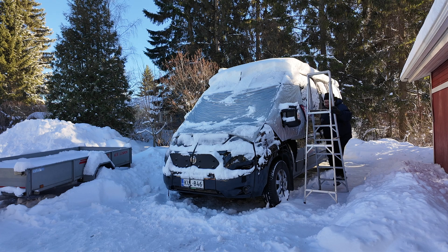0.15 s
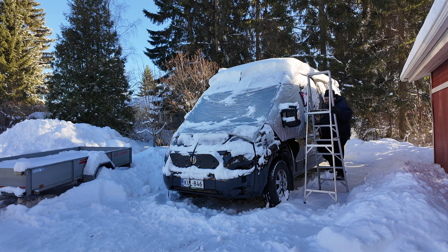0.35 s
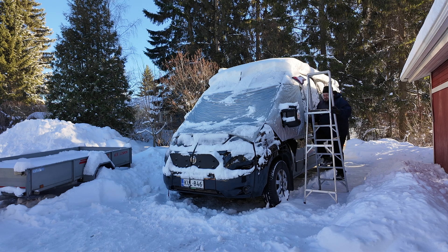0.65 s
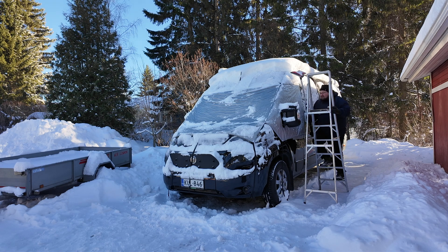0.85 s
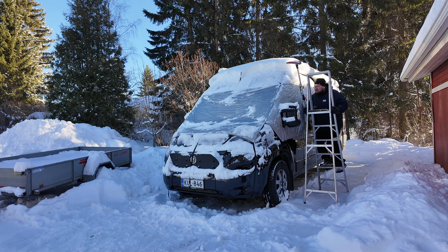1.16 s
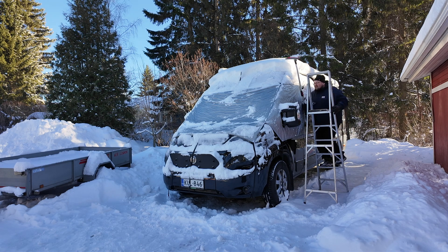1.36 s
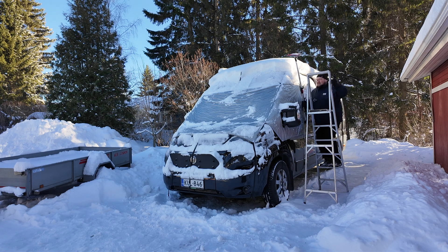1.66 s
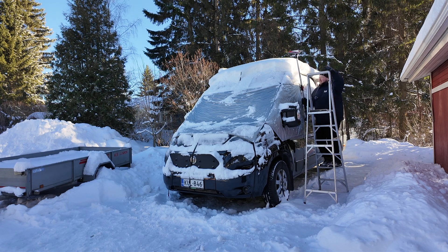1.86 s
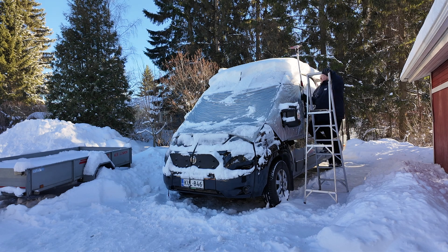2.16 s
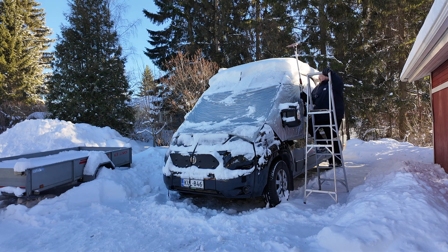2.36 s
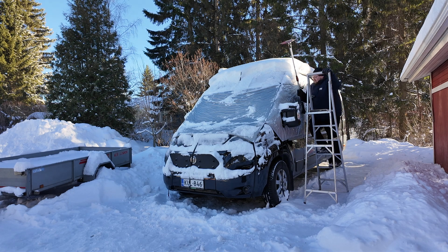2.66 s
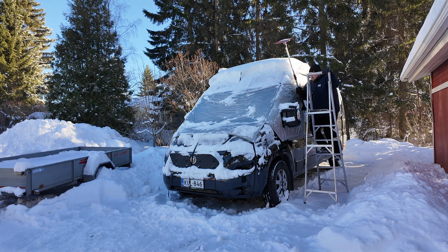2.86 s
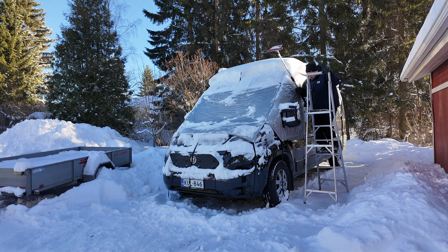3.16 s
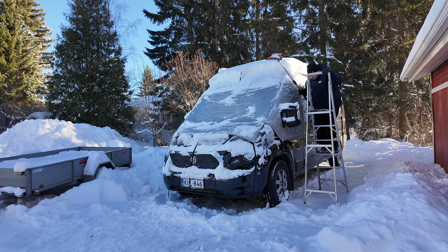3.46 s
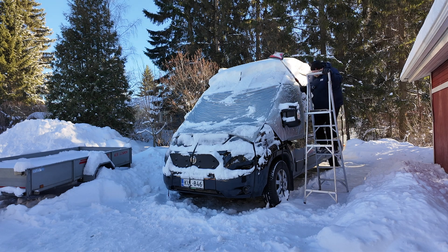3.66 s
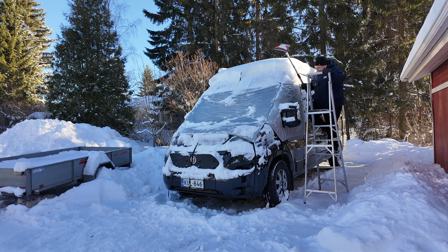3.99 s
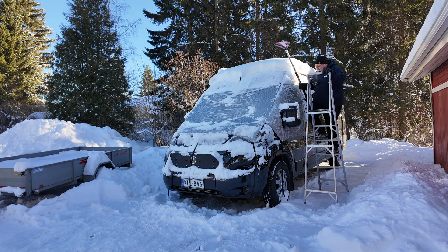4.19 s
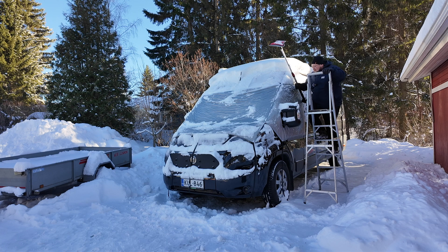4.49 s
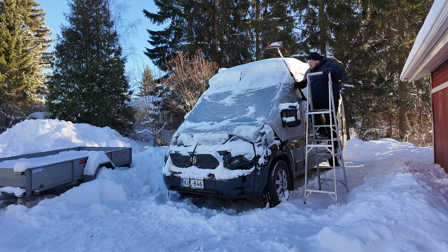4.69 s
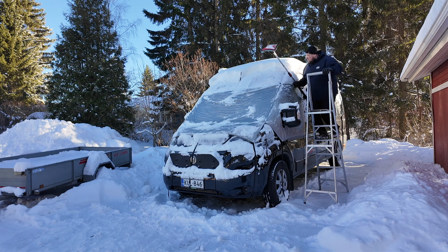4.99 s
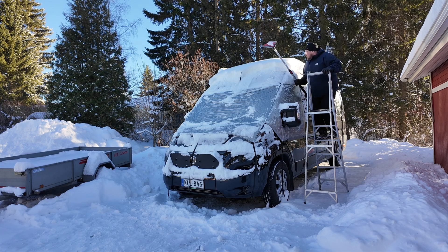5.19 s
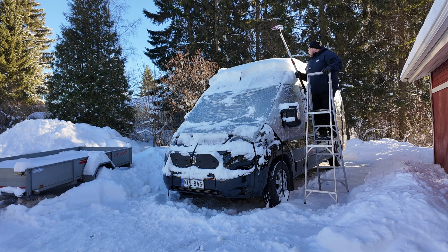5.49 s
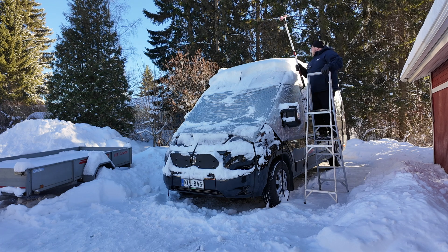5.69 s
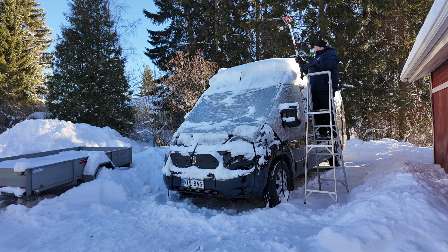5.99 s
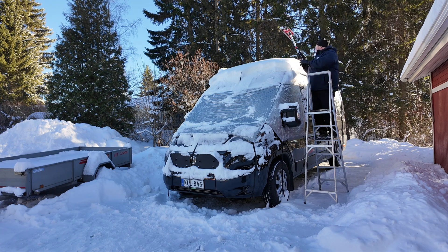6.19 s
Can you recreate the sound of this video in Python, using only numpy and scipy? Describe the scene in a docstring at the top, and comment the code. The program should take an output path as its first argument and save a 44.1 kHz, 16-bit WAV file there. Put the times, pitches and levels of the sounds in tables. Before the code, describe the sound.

Someone climbs a light metal ladder beside a snowed-in van outdoors. Crunching snow and a loud double clack of the tool come first, then clustered sole knocks and crunchy steps. The pole extends with a rasping tubular hiss and clicks. Further crunching steps rise to the strongest one, cloth swishes, then a tiny squeak and a short soft snow sweep. Still air, short dull reflections.

```python
"""Snow crunches under boots and soles land on an aluminium ladder beside a snowed-in van in a quiet yard.
A snow tool knocks, its pole slides out, a jacket rustles, the ladder squeaks, and at last the soft
head sweeps snow off the roof. Contacts are fractured noise driving struck modes; cloth, friction and
loose snow are coloured grains; the pole's air column and the squeak are gliding or wavering tones.
A scattered tail and a steady bed of air surround the work."""
import sys
import numpy as np
from scipy import signal
from scipy.fft import rfft, irfft
from scipy.io import wavfile
from scipy.ndimage import uniform_filter1d

SR = 44100
rng = np.random.default_rng(int(sys.argv[2]) if len(sys.argv) > 2 else 0)


def wav_out(sig):
    """Save sig, one row per channel (or a flat mono array), as 16-bit PCM at SR to the path in sys.argv[1]."""
    wavfile.write(sys.argv[1], SR, np.round(np.clip(np.atleast_2d(sig).T, -1, 1) * 32767).astype(np.int16))


N = 279594
TIME = np.arange(N) / SR
RING_TIME = TIME[:32768]   # time axis of every impulse response


def from_db(db):
    """Logarithmic level: decibels become an amplitude gain."""
    return 10 ** (np.asarray(db) / 20)


def unit_energy(x):
    """Parseval's relation: a response of unit energy passes white noise at equal power."""
    return x / np.sqrt(np.sum(x ** 2) + 1e-20)


def in_time(rows):
    """Linear interpolation: the columns of a curve at every sample."""
    start_s, *columns = np.transpose(rows)
    return [np.interp(TIME, start_s, column) for column in columns]


def swells(rows):
    """Gaussian envelope: the summed power of smooth strokes, each a bell around its middle."""
    return sum(from_db(level_db) ** 2 * np.exp(-2 * np.pi * ((TIME - middle_s) / length_s) ** 2)
               for middle_s, length_s, level_db in rows)


def band(x, low_hz, high_hz, order=3):
    """Causal band-pass: a Butterworth filter keeps one register."""
    edges_hz = [low_hz, min(high_hz, .45 * SR)]
    return signal.sosfilt(signal.butter(order, edges_hz, "band", fs=SR, output="sos"), x + 1e-18)


def through(x, response):
    """Linear superposition: every sample of a signal sets off the impulse response."""
    return signal.fftconvolve(x, response)[:N]


def resonance(x, hz, quality):
    """Simple resonator: one broad peak with gain 1 on top."""
    return signal.lfilter(*signal.iirpeak(hz, max(quality, 1), fs=SR), x + 1e-18)


def hollow(x, hz, reflection, count):
    """Comb filtering: repeated reflections in a gap reinforce multiples of hz, which may vary in time."""
    weights = unit_energy(np.clip(reflection, 0, .9) ** np.arange(count))
    return sum(weight * np.interp(TIME - k / hz, TIME, x) for k, weight in enumerate(weights))


def colour(points):
    """Minimum phase by folding the cepstrum: the given spectrum, falling 12 dB more per octave past its ends."""
    hz, db = np.transpose(points)
    size = len(RING_TIME)
    log_hz = np.log(np.maximum(np.fft.rfftfreq(size, 1 / SR), 1))
    outside = np.abs(log_hz - np.clip(log_hz, np.log(hz[0]), np.log(hz[-1])))
    gain = from_db(np.interp(log_hz, np.log(hz), db))
    cepstrum = irfft(np.log(gain) - 2 * outside)
    cepstrum[size // 2:] = 0
    return unit_energy(irfft(np.exp(rfft(2 * cepstrum))))


def ringing(modes):
    """Modal superposition: struck modes, each a dying sine with its share of the energy."""
    response = np.zeros(len(RING_TIME))
    for hz, energy_db, t60 in modes:
        mode = np.sin(2 * np.pi * hz * RING_TIME) * from_db(-60 * RING_TIME / t60)
        response += from_db(energy_db) * rng.choice([-1, 1]) * unit_energy(mode)
    return response


def grains(per_s, spread_db, smooth_db, size=400):
    """Shot noise: tiny fractures of uneven size over smooth friction, at an even running power of 1."""
    sizes = from_db(spread_db * np.minimum(rng.exponential(1, N), 4)) * rng.choice([-1, 1], N)
    clicks = sizes * (rng.random(N) < per_s / SR)
    x = clicks / clicks.std() + from_db(smooth_db) * rng.standard_normal(N)
    return x / np.sqrt(uniform_filter1d(x ** 2, size) + 1e-9)


# spectrum of the still air: pitch_hz [Hz], relative_db [dB per Hz]
AIR_SPECTRUM = [(20, -34), (45, -14), (80, -6), (140, 0.5), (300, -9), (700, -12.5), (2000, -25.5),
                (7000, -21.5), (16000, -38)]


def winter_air(level_db=-63):
    """Stationary noise: the air is a steady bed of coloured random pressure."""
    return from_db(level_db) * through(rng.standard_normal(N), colour(AIR_SPECTRUM))


# scattered tail of the yard: low_hz [Hz], high_hz [Hz], relative_db [dB], t60_s [s]
YARD_TAIL = [(80, 190, -9, 0.41), (350, 1260, -13, 0.28), (1400, 2400, -19.5, 0.17),
             (5000, 12000, -61, .25)]


def yard(x, build_s=0.045):
    """Diffuse scattering: shed wall and trees return a short, dull tail; the snow swallows the rest."""
    tail = 0
    for low_hz, high_hz, db, t60 in YARD_TAIL:
        envelope = np.minimum(RING_TIME / build_s, 1) * from_db(-60 * RING_TIME / t60)
        scatter = rng.standard_normal(len(RING_TIME)) * envelope
        tail = tail + from_db(db) * band(unit_energy(scatter), low_hz, high_hz, order=2)
    return through(x, tail)


# swishes of the jacket with each reach: middle_s [s], length_s [s], level_db [dB]
JACKET_SWISHES = [(0.02, 0.49, -49.5), (0.58, 0.52, -49), (1.05, 0.24, -48), (1.5, 0.4, -55),
                  (2.03, 0.39, -52), (2.3, 0.11, -55.5), (2.64, 0.15, -51), (2.84, 0.17, -59),
                  (3.22, 0.36, -56), (4.12, 0.17, -59), (4.6, 0.2, -52.5), (4.76, 0.1, -51),
                  (5.02, 0.31, -54), (5.88, 0.9, -61), (6.14, 0.18, -54.5)]
# spectrum of dull rubbing: pitch_hz [Hz], relative_db [dB per Hz]
RUBBING_SPECTRUM = [(60, -7.5), (130, -0.5), (300, 0.5), (480, 4), (640, 5), (1000, 1.5), (1350, -1.5),
                    (2000, -32.5)]
# spectrum of the jacket's hiss: pitch_hz [Hz], relative_db [dB per Hz]
JACKET_SPECTRUM = [(900, -13.5), (1450, 1), (2100, 1.5), (3300, 5), (4300, -1.5), (6700, -1.5),
                   (9000, -11.5), (12000, -22.5), (16000, -36)]
REST_DB = -61   # rustle between reaches
RUB_DB = -0.5   # dull rubbing re jacket hiss
# a sole keeps rubbing after it lands, barely stronger after a longer landing (dB per second of its t60)
SETTLE_DB, SETTLE_T60_S, SETTLE_DB_PER_S = -53.5, 1.0, 0.2


def movement(sheen_hz=1560, wander=0.24):
    """Sliding friction: sleeves hiss with a wandering hollow sheen; clothes and soles rub dully on the ladder."""
    reach = from_db(REST_DB) ** 2 + swells(JACKET_SWISHES)
    usual_s = np.mean([length_s for s, rise, length_s, *rest in SOLE_CONTACTS])
    settle = np.zeros(N)
    for s, rise, length_s, *rest in SOLE_CONTACTS:
        settle_db = SETTLE_DB + SETTLE_DB_PER_S * (length_s - usual_s)
        settle += (TIME >= s) * from_db(settle_db - 60 * np.abs(TIME - s) / SETTLE_T60_S) ** 2
    rubbing = through(grains(per_s=250, spread_db=3.5, smooth_db=2.5, size=4000), colour(RUBBING_SPECTRUM))
    posture = uniform_filter1d(uniform_filter1d(rng.standard_normal(N), size=20000), size=20000)
    gap_hz = sheen_hz * np.exp(wander * posture / posture.std())
    fibres = grains(per_s=2500, spread_db=5.5, smooth_db=1.5, size=3000)
    cloth = through(hollow(fibres, gap_hz, reflection=0.3, count=3), colour(JACKET_SPECTRUM))
    return np.sqrt(from_db(RUB_DB) ** 2 * reach + settle) * rubbing + np.sqrt(reach) * cloth


# thin high ticks: start_s [s], level_db [dB]
HIGH_TICKS = [(5.881, -42.5), (5.889, -50), (5.901, -44)]


def high_ticks(t60=0.023, low_hz=7700, high_hz=9100):
    """Exponential decay: a quick run of faint, thin ticks, each a dying burst of band-limited noise."""
    level = sum(from_db(db - 60 * np.abs(TIME - s) / t60) * (TIME >= s) for s, db in HIGH_TICKS)
    response = unit_energy(band(RING_TIME == 0, low_hz, high_hz, order=2))
    return through(level * rng.standard_normal(N), response)


# squeaks of the ladder: start_s [s], length_s [s], level_db [dB]
LADDER_SQUEAKS = [(5.508, 0.01, -34), (5.518, 0.013, -28), (5.524, 0.036, -46.5)]
# partials of the squeak: multiple [of the fundamental], relative_db [dB]
PARTIALS = [(1, -9), (3, -19), (4, -16), (5, -2)]


def squeaks(pitch_hz=920, waver=0.0165):
    """Stick-slip: a dry ladder joint slips at an unsteady rate; the fifth partial is strongest."""
    unsteady = uniform_filter1d(rng.standard_normal(N), size=50)
    phase = 2 * np.pi * np.cumsum(pitch_hz * (1 + waver * unsteady / unsteady.std())) / SR
    level = np.zeros(N)
    for s, length, db in LADDER_SQUEAKS:
        level += from_db(db) * np.sin(np.pi * np.clip((TIME - s) / length, 0, 1))
    tone = sum(from_db(db) * np.sin(round(k) * phase) for k, db in PARTIALS)
    return np.sqrt(2) * level * tone


# low, dull thumps: start_s [s], level_db [dB], pitch_hz [Hz] at the start
LOW_THUMPS = [(0.523, -19.5, 194), (0.578, -38, 105), (0.665, -27, 181), (1.31, -33, 118),
              (3.284, -36, 212), (4.348, -29, 111), (5.919, -48, 110)]


def thumps(rise_s=0.001, t60_s=0.036, sag_s=0.051):
    """Damped oscillation: a dull thump is a few low cycles whose pitch would halve in the sag time."""
    out = np.zeros(N)
    for s, db, hz in LOW_THUMPS:
        t = np.maximum(TIME - s, 0)
        phase = 2 * np.pi * hz * sag_s * np.log1p(t / sag_s)
        decay = from_db(db - 60 * np.maximum(t - rise_s, 0) / t60_s)
        out += decay * np.minimum(t / rise_s, 1) * np.sin(phase)
    return band(out, 55, 900, order=2)


# the pole slides out: start_s [s], level_db [dB], pitch_hz [Hz] of the tube resonance
POLE_SLIDE = [(2.28, -77, 1860), (2.35, -41.5, 1640), (2.40, -39.5, 1452), (2.45, -33.5, 1440),
              (2.50, -43, 1497), (2.58, -39, 1450), (2.64, -56, 1370), (2.70, -75, 1400)]
# spectrum of its friction: pitch_hz [Hz], relative_db [dB per Hz]
SLIDE_SPECTRUM = [(700, -22), (1500, -29), (2100, -5), (3000, -1.5), (4400, -8), (6500, -5.5),
                  (9500, -20.5), (16000, -50)]


def pole_slide(width_hz=90, hollow_hz=1450):
    """Air-column resonance: tube hisses in tube, and the column sings, sinking overall as it grows longer."""
    level_db, tube_hz = in_time(POLE_SLIDE)
    rub = grains(per_s=12000, spread_db=5.5, smooth_db=16)
    friction = through(hollow(rub, hollow_hz, reflection=0.22, count=7), colour(SLIDE_SPECTRUM))
    phase = 2 * np.pi * np.cumsum(tube_hz) / SR
    blur = unit_energy(np.exp(-np.pi * width_hz * RING_TIME))   # friction noise keeps the column ringing
    excitation = through([1, 1j] @ rng.standard_normal((2, N)), blur)
    sing = (excitation * np.exp(1j * phase)).real
    return from_db(level_db) * (from_db(-4.5) * friction + from_db(-10.0) * sing)


# light passes of the soft head over the roof snow: middle_s [s], length_s [s], level_db [dB]
ROOF_SKIMS = [(3.27, 0.18, -58), (3.65, 0.35, -56.5), (5.12, 0.37, -62)]
# spectrum of a skim: pitch_hz [Hz], relative_db [dB per Hz]
SKIM_SPECTRUM = [(1500, -9), (3800, -6), (5200, -1.5), (7000, -5.5), (10500, -16), (15000, -33)]


def roof_skims(sheen_hz=1700):
    """Granular friction: light passes of the head raise only a thin, high hiss."""
    friction = grains(per_s=4400, spread_db=9, smooth_db=19.0, size=2000)
    crystals = hollow(friction, sheen_hz, reflection=0.23, count=3)
    return np.sqrt(swells(ROOF_SKIMS)) * through(crystals, colour(SKIM_SPECTRUM))


# the head sweeps the roof: start_s [s], level_db [dB]
ROOF_SWEEP = [(6.03, -84), (6.10, -54), (6.14, -46.5), (6.185, -39), (6.215, -42.5), (6.245, -34),
              (6.27, -43.5), (6.30, -45), (6.34, -54.5)]
# spectrum of the sweep: pitch_hz [Hz], relative_db [dB per Hz]
SWEEP_SPECTRUM = [(24, -32), (40, -8), (104, -0.5), (243, -9), (283, -4.5), (422, -10.5), (1270, -5.5),
                  (1760, -13.5), (2570, -10), (3060, -12), (7540, -18.5), (16000, -54)]


def roof_sweep():
    """Granular flow: the soft head pushes loose crystals across the roof."""
    level_db, = in_time(ROOF_SWEEP)
    crystals = grains(per_s=2500, spread_db=2.0, smooth_db=0, size=900)
    return from_db(level_db) * through(crystals, colour(SWEEP_SPECTRUM))


# registers of a contact, thud, body, crunch, fizz: low_hz [Hz], high_hz [Hz, held below 0.45 SR]
CONTACT_REGISTERS = [(62, 389), (290, 1176), (1400, 4850), (5000, 27000)]
# spectrum of a contact: pitch_hz [Hz], relative_db [dB per Hz]
CONTACT_SPECTRUM = [(40, -15), (100, -20), (200, -6), (300, -3), (480, 0.5), (850, -4.5), (1120, -2.5),
                    (1600, -5), (3500, -6), (4500, -9.5), (7000, -11.5), (10000, -26.5), (16000, -48)]


def contacts(table, modes, fractures, ring_db, blow_db, focus_db, trim_db, quality=4.9):
    """Source and filter: each contact lands, loads up and lets go, driving resonances set by where it touches."""
    drive = np.zeros((len(CONTACT_REGISTERS), N))
    for s, rise, t60, *levels_db, body_hz, crunch_hz in table:
        start, rise = max(round(s * SR), 0), max(rise, 1 / SR)
        t = RING_TIME[:min(N - start, SR // 3)]
        load = np.minimum(t / rise, 1) * from_db(-60 * np.maximum(t - rise, 0) / t60)
        grinding = load * fractures[rng.integers(N // 2):][:len(t)]
        # the more sudden the touch, the stronger its first blow
        blow = np.outer(from_db(blow_db), t == 0) * np.exp(-rise / 0.011)
        thud, body, crunching, fizz = grinding + blow
        focused = []
        for force, hz, db in zip((body, crunching), (body_hz, crunch_hz), focus_db):
            peak = from_db(db) * resonance(force, hz, quality)
            focused.append((force + peak) / np.sqrt(1 + from_db(db)))
        drive[:, start:start + len(t)] += from_db(levels_db)[:, None] * [thud, *focused, fizz]
    response = colour(CONTACT_SPECTRUM) + from_db(ring_db) * ringing(modes)
    return sum(from_db(db) * through(x, unit_energy(band(response, low_hz, high_hz)))
               for x, (low_hz, high_hz), db in zip(drive, CONTACT_REGISTERS, trim_db))


def knock(s, rise, t60, db, body_db, hz):
    """Impact spectrum: a bright clack over as much hollow body as the touch wakes; hollow knocks are duller."""
    thud_db = db + body_db - 8
    fizz_db = db - 11 - 0.39 * body_db   # dB of fizz lost for each dB of hollow body
    return (s, rise, t60, thud_db, db + body_db, db, fizz_db, 858, hz)   # 858 Hz: the hollow body


# the snow tool knocks and its lock clicks: start_s [s], t60_s [s], level_db [dB],
# body_db [dB re level, hollow body], pitch_hz [Hz, the clack]
TOOL_KNOCKS = [(0.178, 0.12, -34, -4.5, 3600), (0.523, 0.072, -17, -3, 3500),
               (0.533, 0.023, -15.5, -5.5, 3500), (0.546, .2, -32, 1, 3450), (0.58, 0.22, -35, 1.5, 2300),
               (0.647, 0.031, -36, -13, 3110), (0.665, 0.089, -36.5, 1, 2800),
               (0.699, 0.017, -41, 8.5, 3000), (1.328, 0.06, -42, -25, 3720),
               (2.103, 0.038, -32.5, -1.5, 2340), (2.242, 0.031, -41, -16, 2770),
               (2.567, 0.21, -30.5, -9, 2750), (2.604, 0.023, -20, -31.5, 2780),
               (2.617, 0.014, -23, -11, 2850), (2.68, 0.033, -35.5, -4, 2830),
               (2.693, 0.016, -31.5, -22, 2880), (2.746, 0.057, -43.5, -20, 3270),
               (2.787, 0.016, -36, -11, 2950), (2.898, 0.048, -41, -25, 2570),
               (3.325, 0.0076, -49, 15, 2200), (4.13, 0.048, -45, -3.5, 2940),
               (4.976, 0.051, -39.5, 2, 2900)]
# the pole binds and rasps as it slides: start_s [s], rise_s [s], t60_s [s], level_db [dB],
# body_db [dB re level, hollow body]
POLE_RASPS = [(2.462, .02, 0.16, -25, -3), (2.508, .0025, 0.36, -39, 10), (2.592, 0.011, 0.025, -34.5, 11)]
# modes of the tool's pole: pitch_hz [Hz], energy_db [dB], t60_s [s]
POLE_MODES = [(194, -6, 0.018), (935, -19, 0.033), (2648, -5, 0.017), (3760, -40, 0.027),
              (5830, -30, 0.014), (7860, -11.5, 0.0029)]


def tool_knocks(knock_rise_s=0.00078, rasp_hz=3100):
    """Forced vibration: hard, short chatter of the pole and its lock drives the pole's modes."""
    chatter = grains(per_s=1300, spread_db=8.5, smooth_db=-8.5, size=150)
    touches = [knock(s, knock_rise_s, *rest) for s, *rest in TOOL_KNOCKS]
    touches += [knock(*row, rasp_hz) for row in POLE_RASPS]
    return contacts(touches, POLE_MODES, chatter, ring_db=-5.5, blow_db=[6.6, 15.5, 9.8, 6.0],
                    focus_db=[6, 7], trim_db=[-3.4, -1.45, -1.15, -1.8])


def snow_hz(grit_db, lowest_hz=1600):
    """Fracture pitch: gritty snow breaks higher, an octave per 12 dB of grit, within one octave in all."""
    return np.clip(2780 * 2 ** (grit_db / 12), lowest_hz, 2 * lowest_hz)


def sole_contact(s, rise, t60, db, weight_db, grit_db, hz):
    """Impact loading: a thud, with fizz raised by both the weight and the snow under the sole."""
    fizz_db = db + (weight_db + grit_db) / 2 - 7   # re the mean of thud and grit
    return (s, rise, t60, db + weight_db, db, db + grit_db, fizz_db, hz, snow_hz(grit_db))


def crunch(s, rise, t60, db, grit_db, hz):
    """Brittle fracture: the grittier the snow and the more abruptly it breaks, the more it fizzes."""
    grit_level_db = db + grit_db
    snap_db = 1.5 * np.log2(0.0031 / rise)   # extra fizz for each halving of the usual 0.0031 s rise
    fizz_db = grit_level_db - 20 + 1.58 * grit_db + snap_db
    return (s, rise, t60, grit_level_db - 19.5, db, grit_level_db, fizz_db, hz, snow_hz(grit_db))


# a sole lands on or scuffs a rung: start_s [s], rise_s [s], t60_s [s], level_db [dB],
# weight_db [dB re level, thud], grit_db [dB re level, grit under the sole], pitch_hz [Hz]
SOLE_CONTACTS = [(0.078, 0.0047, .087, -24.5, -16.5, -8, 850), (0.759, .012, 0.47, -37.5, -5, -1.5, 695),
                 (0.962, 0.0017, 0.21, -29, -15.5, -4.5, 810), (1.009, .0009, 0.11, -24.5, -42, -9.5, 700),
                 (1.065, 0.0013, 0.16, -25.5, -31, -19, 340), (1.11, 0.0011, 0.098, -25, -20, -26, 567),
                 (1.13, 0.0039, 0.1, -27.5, -32, -14.5, 360),
                 (1.612, 0.0027, 0.33, -25.5, -10.5, -11.5, 577),
                 (1.867, 0.0055, 0.22, -41, -9.5, 1.5, 930), (2.776, .0012, .15, -40, -15, -5, 660),
                 (2.828, 0.0013, 0.33, -42, -11.5, -2, 547), (3.059, 0.0025, 0.12, -38.5, -9.5, -30, 350),
                 (3.194, 0.0025, 0.2, -38, -27, -37, 350), (3.352, 0.0026, 0.11, -21, -9, -12, 603),
                 (3.723, 0.0083, 0.16, -40, -9.5, -24, 595), (4.292, 0.0033, 0.21, -35, 0.5, 2.5, 517),
                 (4.305, 0.0056, .12, -25, -9.5, -2, 577), (4.538, 0.0012, 0.13, -41, -21, -3.5, 580),
                 (4.865, 0.0059, .1, -40.5, -9, -22, 530), (5.357, .0028, 0.37, -37, -6, -36, 342),
                 (5.371, .0025, 0.17, -33.5, -18, -2, 540)]
# packed snow gives way under the weight: start_s [s], rise_s [s], t60_s [s], level_db [dB],
# grit_db [dB re level], pitch_hz [Hz]
SNOW_CRUNCHES = [(0.0, 0.0023, 0.2, -29, -5, 830), (0.044, 0.0028, 0.48, -30, -8.5, 618),
                 (0.105, 0.0076, 0.12, -26, -12, 810), (0.209, .0025, 0.34, -32, -9, 637),
                 (0.825, 0.0046, 0.28, -40, -1.5, 795), (1.655, 0.0016, 0.19, -24, 1, 980),
                 (1.683, 0.0036, 0.092, -22.5, 2, 724), (3.37, 0.0016, 0.19, -28.5, -3, 920),
                 (3.436, 0.011, 0.092, -28, -1.5, 900), (4.333, 0.0038, 0.18, -18.5, -5, 1310),
                 (4.352, 0.00091, 0.12, -19, 3.5, 844), (4.38, 0.0073, 0.084, -22.5, -2, 930),
                 (4.642, 0.0014, 0.17, -43.5, 1.5, 584), (4.667, 0.0015, .12, -30, 5.5, 460),
                 (4.688, 0.0037, .17, -27.5, -4, 448), (4.742, .001, 0.31, -34, -9.5, 590),
                 (5.435, .0075, 0.37, -40, -9, 540)]
# modes of the ladder: pitch_hz [Hz], energy_db [dB], t60_s [s]
LADDER_MODES = [(182.6, -4.5, 0.046), (327, -16, 0.11), (460, -17.5, 0.026), (540, -19, 0.7),
                (603.7, -12, 0.11), (629.5, -11.5, 0.17), (836, -13, 0.085), (933, -10.5, 0.18),
                (1258, -6.5, 0.047), (1646, -8.5, 0.022), (2100, -18.5, 0.13), (2407, -8, 0.11),
                (2870, -13, 0.023), (3283, -7.5, 0.044), (3650, -6.5, 0.015), (4560, -28, 0.053)]


def boots():
    """Impact and fracture: the rubber sole lands or scuffs, and packed snow breaks in many small slips."""
    slips = grains(per_s=900, spread_db=1.0, smooth_db=-3.5, size=260)
    touches = [sole_contact(*row) for row in SOLE_CONTACTS] + [crunch(*row) for row in SNOW_CRUNCHES]
    return contacts(touches, LADDER_MODES, slips, ring_db=-6.0, blow_db=[28.9, 20.3, 14.3, 7.7],
                    focus_db=[10, -1], trim_db=[-0.49, -0.28, 1.0, 1.0], quality=6.8)


def scene():
    """Superposition: the work at the van, its scattered tail, the movement and the still winter air."""
    work = boots() + tool_knocks() + thumps() + pole_slide()
    work = work + squeaks() + high_ticks() + roof_sweep() + roof_skims()
    return (work + yard(work) + movement() + winter_air())[None]


def record(dry):
    """Band limiting: an elliptic low-pass cuts the top steeply at 15900 Hz."""
    return signal.sosfilt(signal.ellip(10, .1, 90, 15900, fs=SR, output="sos"), dry)


dry = scene()
out = record(dry)
wav_out(out)
```